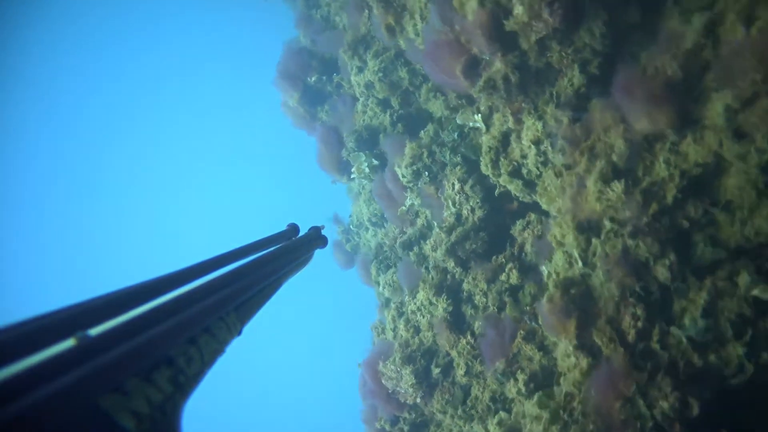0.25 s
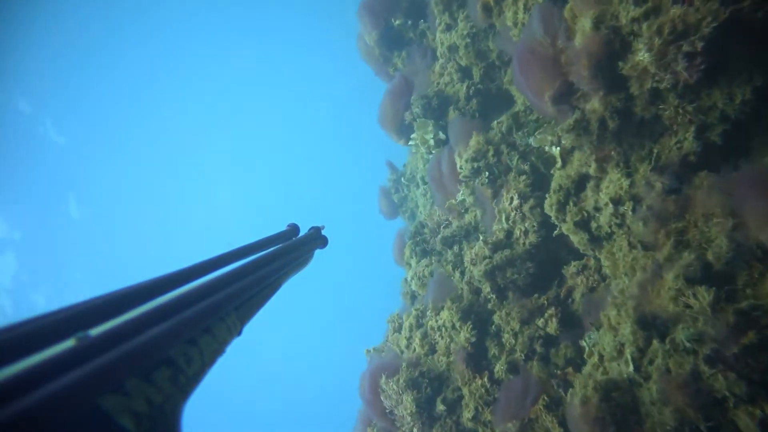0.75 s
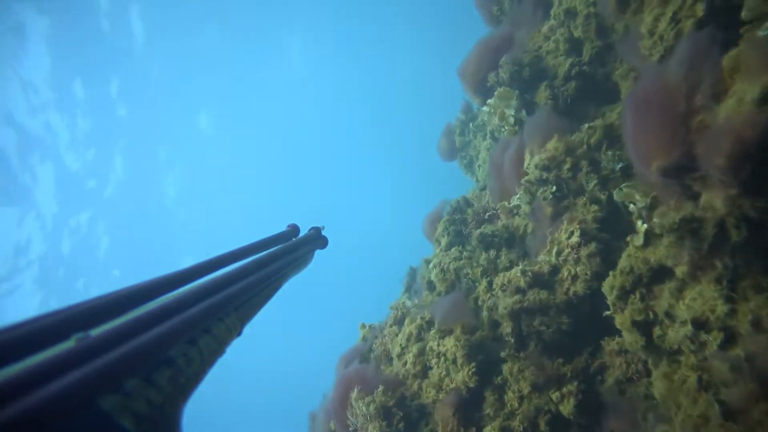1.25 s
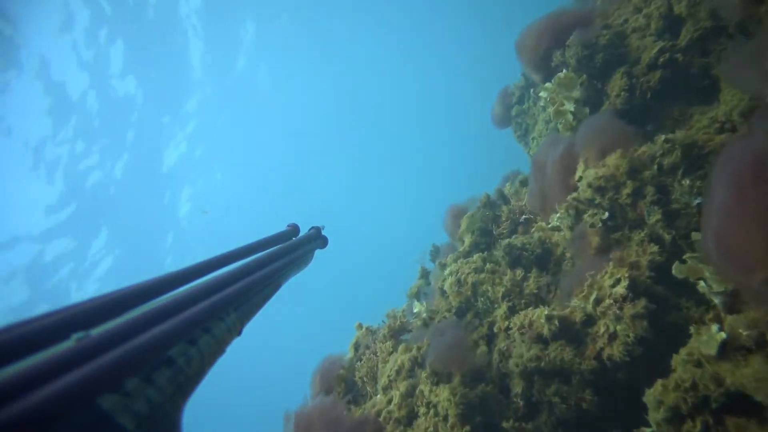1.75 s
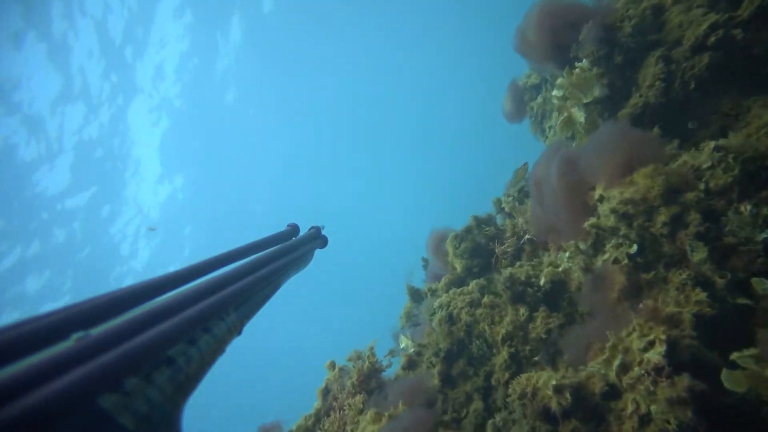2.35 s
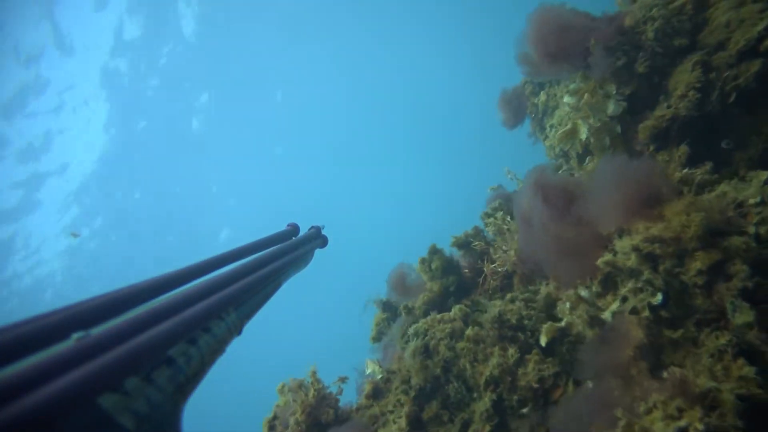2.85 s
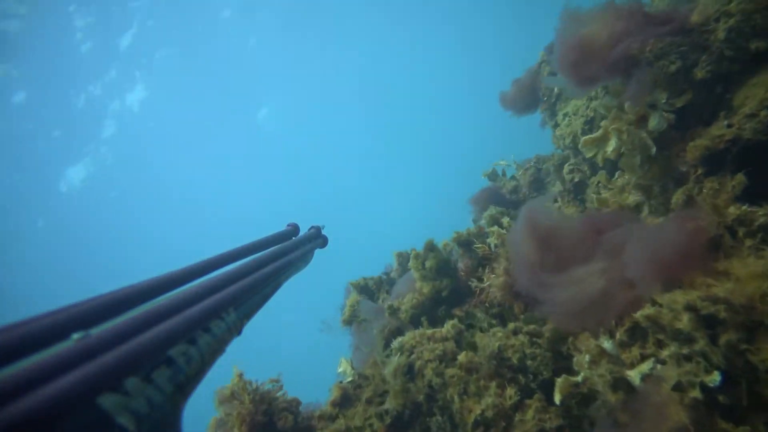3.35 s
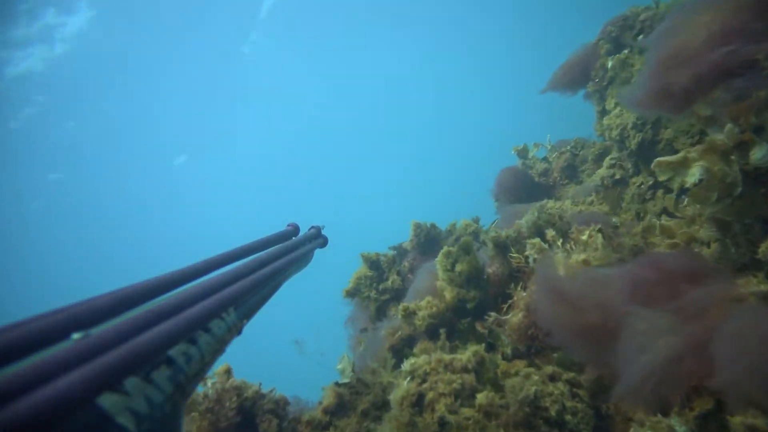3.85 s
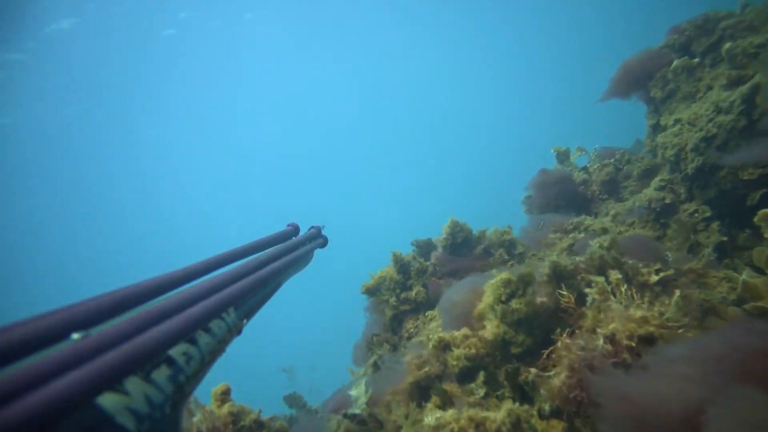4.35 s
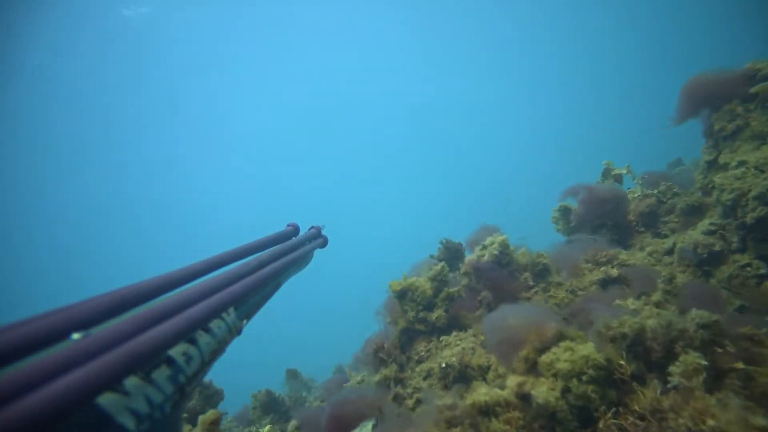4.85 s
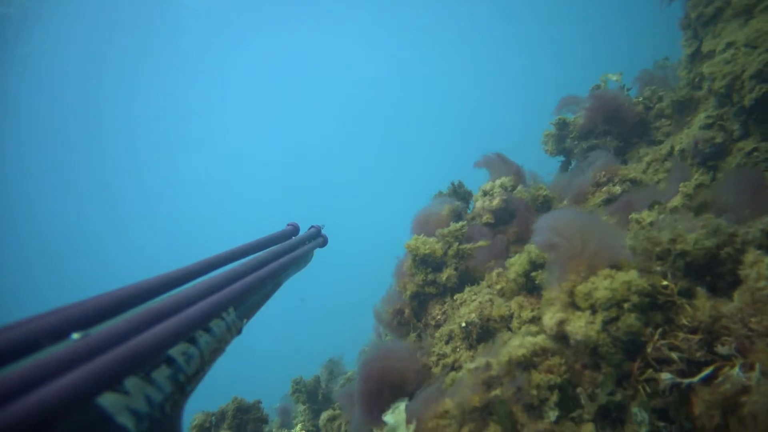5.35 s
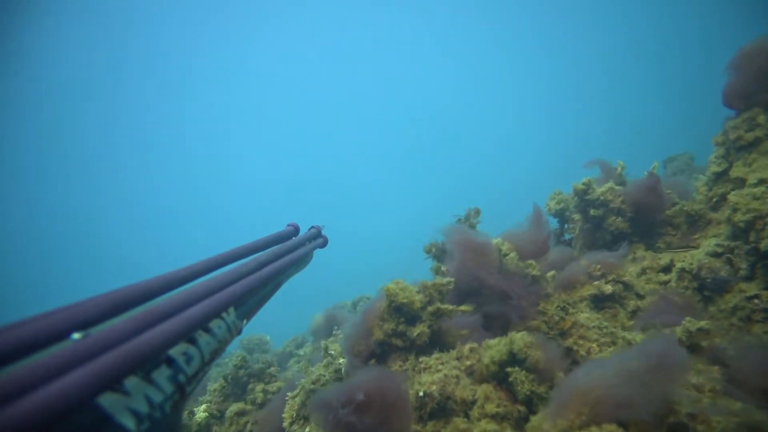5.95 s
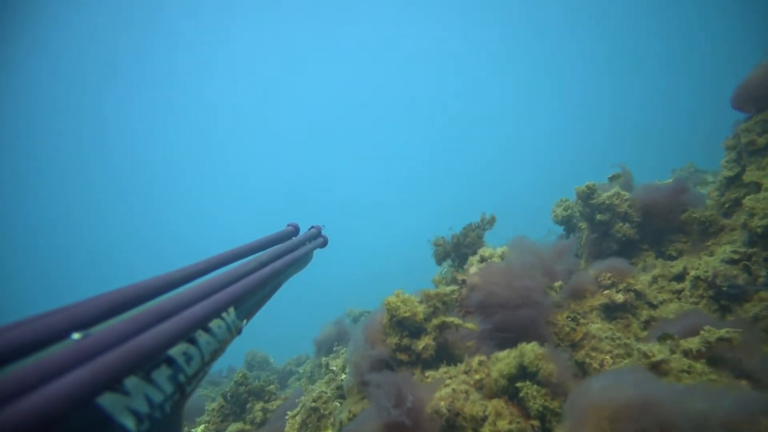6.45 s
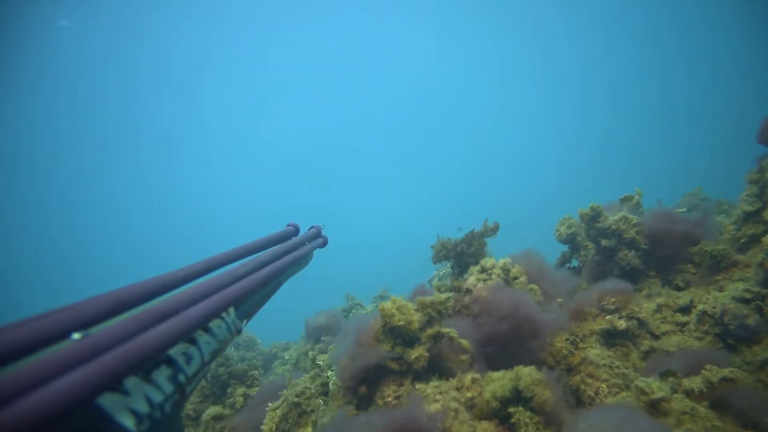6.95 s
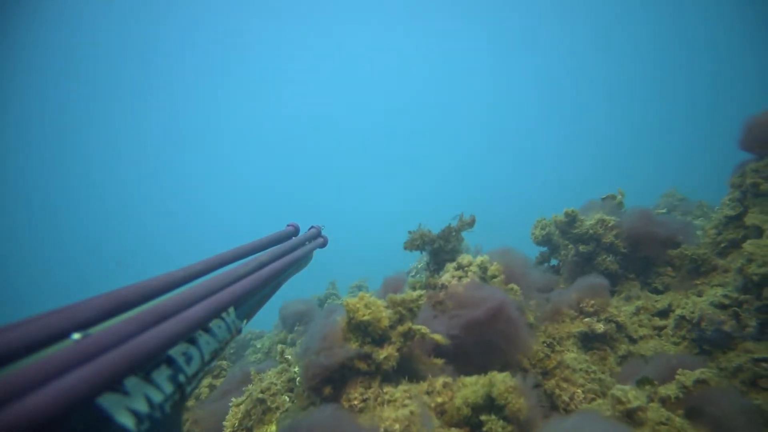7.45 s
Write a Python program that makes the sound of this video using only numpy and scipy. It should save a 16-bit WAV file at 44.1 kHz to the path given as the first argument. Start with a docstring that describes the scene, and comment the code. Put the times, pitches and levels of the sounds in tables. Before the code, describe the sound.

Muffled underwater sound of a dense shrimp crackle, bubbling swells of water against a diver's camera housing, and a few hard snaps.

```python
"""Snapping shrimp crackle around a rocky reef, heard under water through a diver's camera housing.
Far snaps fuse into a sizzle; near ones crack as a spike and a rattle, with an echo and scatter off the rock.
The housing's resonances colour every snap.
Water sloshes past in overlapping swells, each a cloud of ringing bubbles on a noisy wash.
Below lie a low noise rumble, soft thumps and single bubbles that gulp with a rising pitch."""
import sys
import numpy as np
from scipy import signal
from scipy.fft import rfft, irfft, next_fast_len
from scipy.io import wavfile
from scipy.ndimage import map_coordinates

SR = 44100
rng = np.random.default_rng(int(sys.argv[2]) if len(sys.argv) > 2 else 0)


def master(y):
    """Save y as 16-bit WAV."""
    cut = np.clip(np.atleast_2d(y).T, -1, 1)
    pcm = np.round(cut * 32767)  # scale
    wavfile.write(sys.argv[1], SR, pcm.astype(np.int16))


N = 340011  # samples


def amp(db):
    """Decibels to gain."""
    return 10 ** (np.asarray(db) / 20)


def unit(x):
    """Scale to rms 1."""
    return x / np.sqrt(np.mean(x ** 2) + 1e-20)


def along(points, hz):
    """Read (f/Hz, value) points on a log frequency axis."""
    f, v = np.transpose(points)
    return np.interp(np.log(hz + 1), np.log(f + 1), v)


def curve(rows):
    """One value per sample from (t/s, value) rows."""
    return np.interp(np.arange(N) / SR, *np.transpose(rows))


def wobble(rate):
    """A smooth random curve through normal draws, rate knots a second."""
    knots = rng.standard_normal(int(N * rate / SR) + 4)
    return map_coordinates(knots, [np.arange(N) * rate / SR])


def coloured(x, gain):
    """Minimum-phase filter with the given gain of frequency: it rings only after a blow."""
    n = x.shape[-1]
    m = 2 * next_fast_len(n // 2 + 4096)
    cepstrum = irfft(np.log(np.maximum(gain(np.fft.rfftfreq(m, 1 / SR)), 1e-6)))
    # Folding the cepstrum forward in time makes the filter causal.
    cepstrum[1:m // 2] *= 2
    cepstrum[m // 2 + 1:] = 0
    return irfft(rfft(x, m) * np.exp(rfft(cepstrum)), m)[..., :n]


def ports(pair, gain):
    """Two unrelated signals, coloured and mixed into partly alike left and right."""
    # Left-right likeness, as correlation: f/Hz, likeness [0-1]
    likeness = [(30, 0.93), (70, 1), (130, 0.23), (300, 0.59), (700, 0.78), (1200, 0.5), (2400, 0.8),
                (5000, 0.74), (10000, 0.87)]
    alike = lambda hz: np.clip(along(likeness, hz), 0, .995)
    mid = coloured(pair[0], lambda hz: gain(hz) * np.sqrt(1 + alike(hz)))
    side = coloured(pair[1], lambda hz: gain(hz) * np.sqrt(1 - alike(hz)))
    return np.array([mid + side, mid - side])


def housing(hz):
    """Gain of the case: a cluster of resonances with dark valleys between them."""
    # Resonances of the case: f/Hz, width/Hz before narrowing, level/dB
    resonances = [(777, 72, -3.5), (1536, 92, 0.5), (1925, 50, -3), (2374, 178, 5), (2707, 450, 0),
                  (3400, 74, -2), (3920, 344, 1), (4820, 470, -1), (5435, 360, 0.5), (5680, 370, -1),
                  (6100, 380, -4), (6680, 790, -6.5), (7770, 1700, -14), (10050, 1300, -13)]
    power = amp(-11.5) ** 2 * hz / (hz + 300)  # floor of the valleys
    for centre, width, db in resonances:
        offset = (hz - centre) / (0.87 * width)  # each is narrowed a little
        power = power + amp(db) ** 2 / (1 + offset ** 2) ** 2.4
    return np.sqrt(power)


def crackle(rate, spread_db, smear_t60, smear, size=512):
    """Randomly timed snaps of unequal size, each smeared by its own path through the rocks."""
    count = int(rate * N / SR)
    start = rng.integers(0, N, count)
    strength = amp(spread_db * np.minimum(rng.standard_normal(count), 1.4))  # caps the loudest
    decay = amp(-60 * np.arange(size) / SR / smear_t60)
    shape = smear * rng.standard_normal((2, count, size)) * decay
    shape[0, :, 0] += 1  # the direct click
    where = (start[:, None] + np.arange(size)).ravel()
    return np.array([np.bincount(where, (strength[:, None] * one).ravel(), N + size)[:N] for one in shape])


def crevice(gain, rate, ripple_db, size=14):
    """The shrimp of one crevice share a random colour of their own."""
    ripple = np.c_[np.geomspace(1500, 11000, size), ripple_db * rng.standard_normal(size)]
    snaps = crackle(rate, spread_db=7, smear_t60=0.022, smear=0.41)
    return unit(ports(snaps, lambda hz: gain(hz) * amp(along(ripple, hz))))


def colony(crevices=7):
    """Dull middle-distance ticks and a thin prickle over the sizzle of thousands of fused far snaps."""
    # Base level of the far shrimp, before layer gains: t/s, level/dB
    colony_level = [(0.0, -53.5), (0.32, -54.5), (2.21, -56), (3.24, -53.5), (3.78, -56), (5.91, -54),
                    (6.05, -52), (7.71, -55.5)]
    dull = lambda hz: housing(hz) * amp(along([(1500, -1), (2700, 0.5), (5000, 0.0), (8000, -6)], hz))
    thin = lambda hz: housing(hz) * amp(along([(2500, -19.0), (5000, 3.0), (9000, 4.0)], hz))
    sizzle = unit(ports(crackle(rate=700, spread_db=1.5, smear_t60=0.027, smear=0.27), housing))
    ticks = unit(sum(crevice(dull, rate=10, ripple_db=3) for _ in range(crevices)))
    prickle = unit(ports(crackle(rate=58, spread_db=7.5, smear_t60=0.0038, smear=0.32), thin))
    layers = amp(1.5) * sizzle + amp(0.5) * ticks + amp(-3.5) * prickle
    return amp(curve(colony_level) + 0.79 * wobble(17)) * layers


def hump(peak_s, length_s, db):
    """Gain of one swell of water: it rises and ebbs evenly, length_s between its 1/e points."""
    roundness = 1.7  # 1 = pointed swell, 2 = round
    t = np.arange(0, N, 64) / SR
    return curve(np.c_[t, amp(db) * np.exp(-np.abs(2 * (t - peak_s) / length_s) ** roundness)])


def flow():
    """Overlapping sloshes add in power: gains of the deep gurgle, the bright gurgle and the froth."""
    # Sloshes of water, before layer trims:
    # peak t/s, length/s, gurgle level/dB, deep over bright gurgle/dB, froth over gurgle/dB
    sloshes = [(0.012, 0.18, -45.5, -17, -9.5), (0.19, 0.18, -53, 3, -6.5),
               (0.359, 0.16, -44.5, -2.5, -3.5), (0.595, 0.22, -51.5, -2, -7.5),
               (0.926, 0.17, -51.5, -1.5, -3.5), (1.266, 0.18, -40, -6, -9.5), (1.402, 0.13, -48, 7, -9),
               (1.845, 0.16, -38, 2, -15.5), (2.088, 0.43, -38.5, 1.5, -11.5), (2.248, 0.11, -41, 2, -16),
               (2.464, 0.052, -43, 16, -15), (2.596, 0.25, -40, 3, -14.5), (2.833, 0.2, -39, 8, -12),
               (2.994, 0.47, -44, 3, -10), (3.24, 0.11, -46.3, 2, -10), (3.432, 0.29, -51.5, 0, -11.5),
               (3.666, 0.18, -40.5, -5.5, -8.5), (3.85, 0.21, -51.0, -2, -9.5),
               (4.052, 0.041, -44.5, 2, -12), (4.227, 0.66, -48.5, -4, -10.5),
               (4.489, 0.12, -44, -3.5, -12.5), (4.826, 0.092, -44.5, -13, -13),
               (4.964, 0.6, -46, -5.5, -10), (5.157, 0.51, -41.5, -3.5, -8), (5.536, 0.11, -41, -10.5, -12),
               (5.655, 0.082, -43.5, -9, -13), (5.884, 0.35, -49.5, -5, -6), (6.109, 0.19, -33.5, -6.5, -8),
               (6.385, 0.32, -40.5, -10.5, -10.5), (6.798, 0.19, -48.5, -5, -7), (6.93, 0.052, -52, -1, -6)]
    deep, bright, froth = amp([-72, -72, -71]) ** 2  # calm water between sloshes
    for peak_s, length_s, db, depth_db, froth_db in sloshes:
        power = hump(peak_s, length_s, db) ** 2
        deep_share = 1 / (1 + amp(-depth_db) ** 2)
        deep = deep + power * deep_share
        bright = bright + power * (1 - deep_share)
        froth = froth + power * amp(froth_db) ** 2
    return np.sqrt([deep, bright, froth])


def bubbles(rate, centre_hz, cycles, spread_db, rise=0.094, size=1500):
    """A cloud of bubbles: each decays 60 dB in the given cycles while its pitch rises a little."""
    count = int(rate * N / SR)
    start = rng.integers(0, N, count)
    draw = np.clip(rng.standard_normal((count, 2)), -2, 2)  # for pitch and level
    turns = centre_hz * np.exp(0.456 * draw[:, :1]) * np.arange(size) / SR
    age = turns / cycles
    tone = np.sin(2 * np.pi * turns * (1 + rise * age))
    envelope = amp(-60 * age) * (1 - np.exp(-2 * turns))
    ring = amp(spread_db * draw[:, 1:]) * tone * envelope
    where = (start[:, None] + np.arange(size)).ravel()
    return unit(np.bincount(where, ring.ravel(), N + size)[:N])


def gurgle(spectrum, rate, centre_hz, wash):
    """Bubbles on a wash of turbulent noise, shaped by one spectrum."""
    cloud = np.array([bubbles(rate, centre_hz, cycles=13.7, spread_db=2.0) for _ in range(2)])
    turbulence = wash * rng.standard_normal((2, N))
    return unit(ports(cloud + turbulence, lambda hz: amp(along(spectrum, hz))))


def surge(deep_gain, bright_gain, froth_gain):
    """Big bubbles gurgle with every slosh, now deeper, now brighter; small ones froth above them."""
    # Filter curves of deep gurgle, bright gurgle and froth, each: f/Hz, relative level/dB
    deep_colour = [(60, -25), (130, -30), (275, -18), (340, -5.5), (400, -4.5), (450, 3), (505, -6.5),
                   (600, 5), (670, 3), (800, -17.5), (1100, -48)]
    bright_colour = [(70, -34), (118, -18.5), (160, -23.5), (235, -16.5), (300, -23), (450, -16.5),
                     (600, -18), (690, -2.5), (745, 1.5), (785, -7), (840, -16), (905, -14.5),
                     (1020, -21.5), (1300, -50)]
    froth_colour = [(700, -33.5), (900, -2), (1040, -8.5), (1230, 7.5), (1320, 4), (1420, 7.5), (1570, 2.5),
                    (1720, -12), (1930, 1), (2080, -5), (2400, 4), (3000, -22), (6000, -26), (11000, -32)]
    deep = deep_gain * amp(-2.0) * gurgle(deep_colour, rate=390, centre_hz=479.7, wash=3.8)
    bright = bright_gain * amp(-2.5) * gurgle(bright_colour, rate=400, centre_hz=726.6, wash=2.5)
    small = froth_gain * amp(-1.0) * gurgle(froth_colour, rate=650, centre_hz=1420, wash=2.86)
    flutter = amp(1.38 * wobble(45))  # unsteadiness of the flow
    # Gurgle leans left, froth leans right.
    return flutter * ((deep + bright) * amp([[.5], [-.5]]) + small * amp([[-.7], [.7]]))


def rumble(strength):
    """Moving water sways the housing at a few low resonances, harder in strong sloshes."""
    # Filter curve of the push: f/Hz, relative level/dB
    push_colour = [(10, -13.5), (38, -5.5), (52, -4), (63, 3.5), (78, -9.5), (98, -10), (118, -6.5),
                   (140, -9), (230, -8), (400, -18.5), (900, -59)]
    # One long heave of the slowest shudder: peak t/s, length/s, level/dB
    heave = (2.45, 0.49, -55)
    shudder_colour = [(15, -42), (27, 1.5), (38, -20), (90, -70)]
    push = unit(ports(rng.standard_normal((2, N)), lambda hz: amp(along(push_colour, hz))))
    shudder = unit(coloured(rng.standard_normal(N), lambda hz: amp(along(shudder_colour, hz))))
    calm_db, drive_db, rest_db = -66, -53.5, -71  # push in calm, its drive at the peak; shudder at rest
    growth = 1.37  # dB of drive per dB of gurgle
    drive = amp(drive_db) * (strength / strength.max()) ** growth
    return np.hypot(amp(calm_db), drive) * push + np.hypot(amp(rest_db), hump(*heave)) * shudder


def snap(low_db, high_db, rattle_t60=.013, size=2048, count=176):
    """A cavitation bubble collapses: a spike, then a rattle in the case; rms 1 over its first count samples."""
    # Colour of a close snap: f/Hz, level/dB
    close_colour = [(300, -13), (1100, -6), (1550, -0.5), (2300, 0), (2750, -1), (3400, 2), (3950, 3),
                    (5100, 1.5), (7200, -1.5)]
    t = np.arange(size) / SR
    blow = rng.standard_normal((2, size)) * amp(-60 * t / rattle_t60)
    blow[0, 0] += 5  # the spike
    tilt = [(2000, low_db), (4200, 0.012), (6000, 0), (8000, high_db)]
    crack = ports(blow, lambda hz: housing(hz) * amp(along(close_colour, hz) + along(tilt, hz)))
    return crack / np.sqrt(np.mean(crack[:, :count] ** 2))


def near_shrimp():
    """Each row's crack is followed by a weaker echo from the rock, and by a faint scatter off the reef."""
    # Near snaps and a few strong echoes of them, before a 1 dB lift:
    # t/s, level/dB, low-mid colour/dB, treble colour/dB
    cracks = [(0.3218, -32.5, -35, 6), (0.5741, -42.5, 4, -4), (0.631, -39.5, -26, -5),
              (0.6942, -36, -8, -7), (0.6992, -39, -9, -16), (0.7998, -45, -18, 1),
              (0.9857, -40.5, -25, -10), (1.7319, -38.5, -0.5, -6), (1.9083, -38, 6, -18),
              (1.9541, -36, 2, -4), (2.0162, -37.5, 3, -4), (2.028, -40.5, -7, 3), (2.339, -38.5, -4, -9),
              (2.5045, -39, 7, -2), (2.5713, -40, 11, -5), (2.732, -40.5, -14, -2), (2.804, -41, -24, -2),
              (3.415, -35.5, 0, -5.5), (3.8586, -36.5, 7, -5), (3.9608, -35.5, 4, 5),
              (4.166, -19, 5.5, -2.5), (4.62, -25.5, 2.5, 7), (4.659, -38.5, 1, -2),
              (4.6988, -41.5, -15, 3), (4.7292, -41.5, -20, -2), (4.761, -37, 7, -6),
              (5.1447, -19.5, -0.5, -4), (5.245, -35, 14, 1), (5.675, -40, 4, -8), (5.7342, -40, 2, -2),
              (5.8733, -40, -19, -5), (6.001, -33, -2, 0), (6.5236, -40.5, 11, -1), (6.5389, -36, 5, -10),
              (6.5449, -29, -5.5, -2.5), (6.5828, -40.5, 16, -11), (6.9051, -42.5, 11, -14),
              (6.9362, -43, 2, -10), (6.9408, -35.5, 4, -8), (6.9465, -43, 8, -10), (7.041, -42, 6, 3),
              (7.1185, -36, 8.5, -9), (7.1258, -39, 5, -19), (7.1848, -41, -14, 2), (7.3684, -44.5, 7, -5),
              (7.375, -40.5, -1, -5), (7.5954, -33.5, 1, -3), (7.602, -33.5, 1, -3)]
    echo_s, echo_db = 0.0086, -21.5  # return from the nearest rock
    scatter_t60, scatter_db = 0.066, -18.5  # diffuse return: s, dB
    out = np.zeros((2, N + SR))
    for s, db, low_db, high_db in cracks:
        for start, level_db in [(s, db), (s + echo_s, db + echo_db)]:
            crack = amp(level_db + 1.0) * snap(low_db, high_db)
            out[:, round(start * SR):][:, :crack.shape[1]] += crack
    t = np.arange(SR // 4) / SR
    scatter = rng.standard_normal(len(t)) * amp(-60 * t / scatter_t60)
    reef = signal.fftconvolve(out, scatter[None] / np.linalg.norm(scatter), axes=1)
    return out[:, :N] + amp(scatter_db) * reef[:, :N]


def swell(age):
    """A smooth rise to 1 at age 1, then a decay."""
    return age ** 2 * np.exp(2 - 2 * age)


def thumps(hz=62, rise_s=0.041):
    """Soft shoves ring a low resonance of the housing: a sine under a smooth swell."""
    # Soft shoves, before a 5 dB cut: t/s, peak level/dB
    shoves = [(1.35, -54), (1.839, -44.5), (1.98, -48), (2.14, -47), (2.281, -49), (2.85, -42), (3.13, -46),
              (3.66, -47), (5.229, -47), (6.109, -44.5)]
    out, t = np.zeros(N + SR), np.arange(SR // 4) / SR
    for s, db in shoves:
        out[round(s * SR):][:len(t)] += amp(db - 5.0) * swell(t / rise_s) * np.sin(2 * np.pi * hz * t)
    return out[:N]


def gulps(rise_s=0.0058):
    """Large single bubbles gulp: a short sine whose pitch rises as it dies."""
    # Large bubbles, before a 4.5 dB cut: t/s, starting f/Hz, peak level/dB
    large_bubbles = [(1.465, 150, -52), (1.61, 195, -47.5), (2.736, 167, -49), (3.659, 144, -48),
                     (6.123, 125, -42), (6.806, 160, -46), (6.976, 161, -48)]
    out, t = np.zeros(N + SR), np.arange(SR // 4) / SR
    for s, hz, db in large_bubbles:
        tone = np.sin(2 * np.pi * hz * t * (1 + 3 * t))
        out[round(s * SR):][:len(t)] += amp(db - 4.5) * swell(t / rise_s) * tone
    return out[:N]


def scene():
    """Shrimp, sloshing water, rumble, thumps and gulps together."""
    deep, bright, froth = flow()
    low_end = rumble(np.hypot(deep, bright)) + thumps() + gulps()
    # All but the surge lean slightly left here; the surge has its own balance.
    return (colony() + near_shrimp() + low_end) * amp([[.3], [-.3]]) + surge(deep, bright, froth)


def record(dry):
    """The two ports hear slightly out of step; a steep band limit cuts the top."""
    # Phase by which the left port leads (negative: lags): f/Hz, phase/rad
    left_lead = [(100, 0.049), (700, -0.17), (1100, -0.58), (2400, -0.048), (3900, 0.26), (6000, 0.45),
                 (10000, 0.069)]
    top_hz = 11100
    m = next_fast_len(N + SR // 2)
    hz = np.fft.rfftfreq(m, 1 / SR)
    step = np.exp(.5j * along(left_lead, hz) * np.array([[1], [-1]]))
    band_limit = 1 / np.sqrt(1 + (hz / top_hz) ** 200)
    return irfft(rfft(dry, m) * step * band_limit, m)[:, :N]


dry = scene()
out = record(dry)
master(out)
```